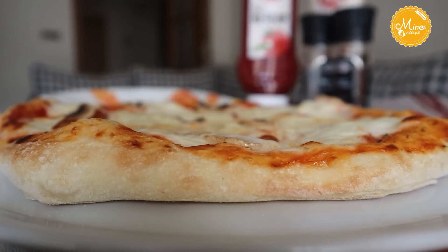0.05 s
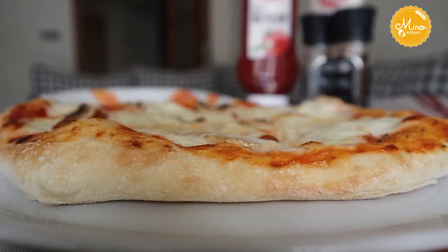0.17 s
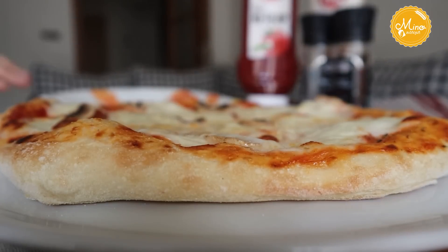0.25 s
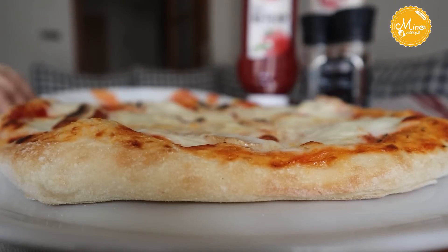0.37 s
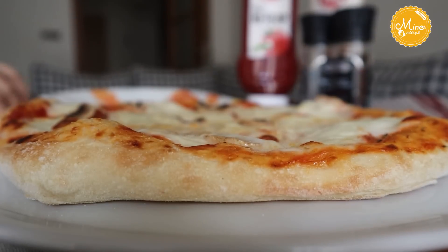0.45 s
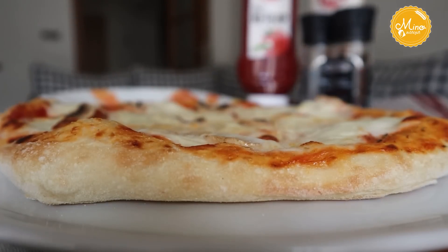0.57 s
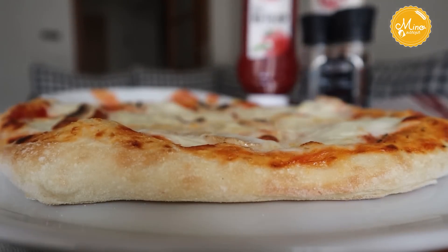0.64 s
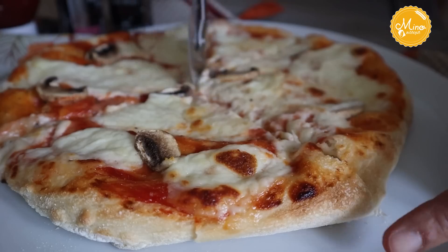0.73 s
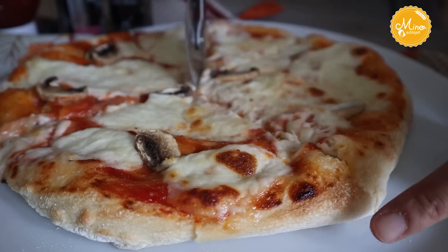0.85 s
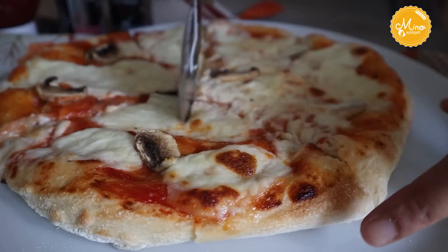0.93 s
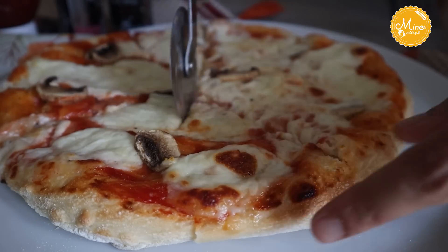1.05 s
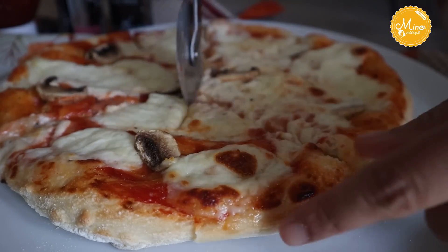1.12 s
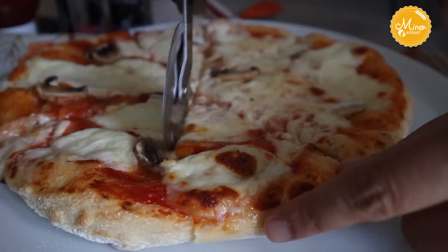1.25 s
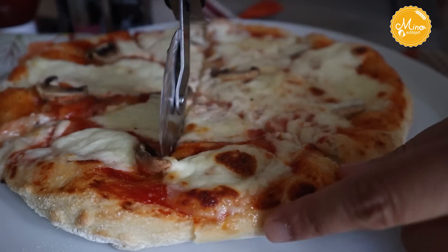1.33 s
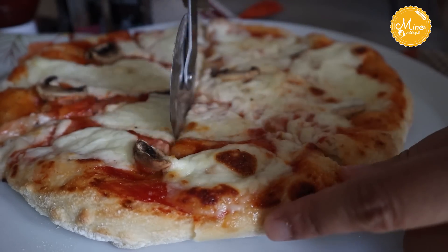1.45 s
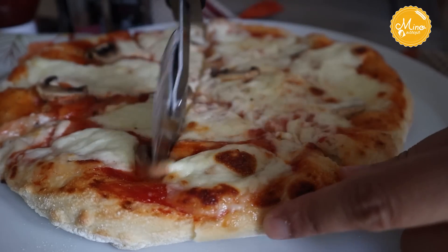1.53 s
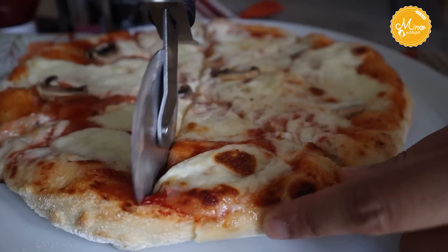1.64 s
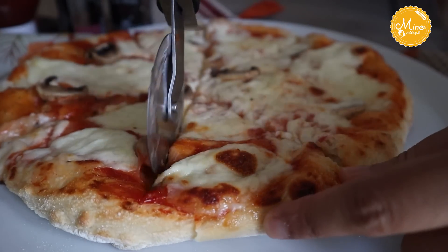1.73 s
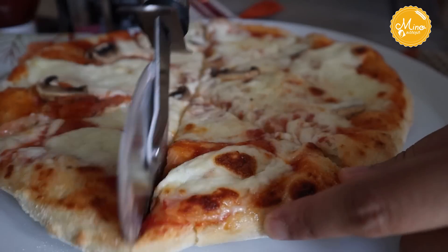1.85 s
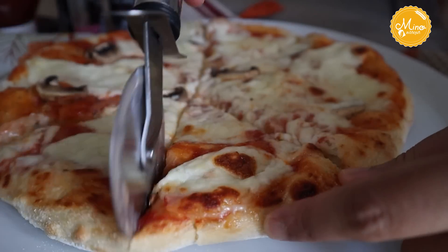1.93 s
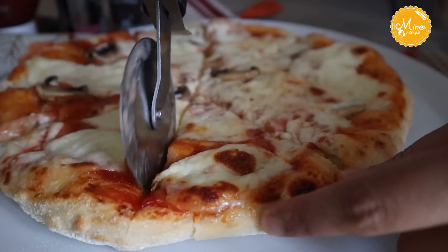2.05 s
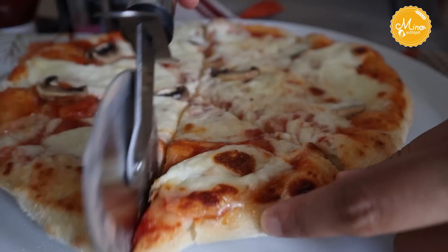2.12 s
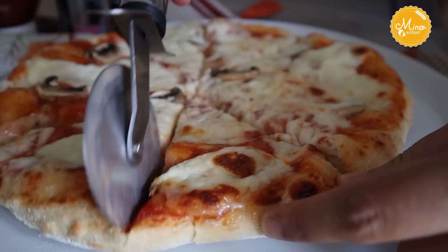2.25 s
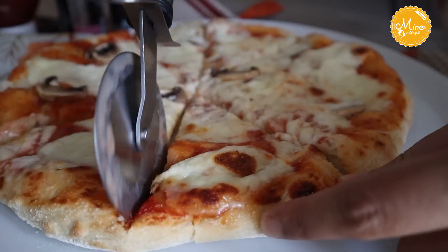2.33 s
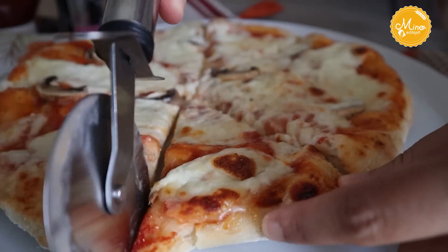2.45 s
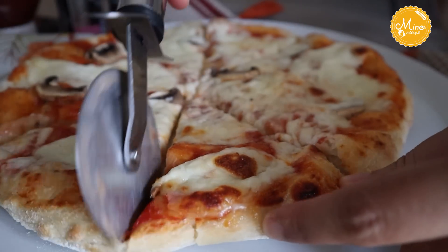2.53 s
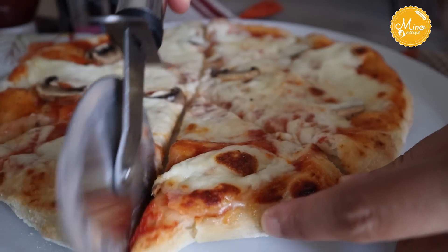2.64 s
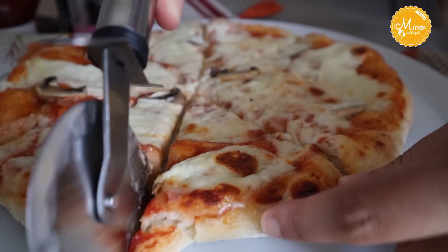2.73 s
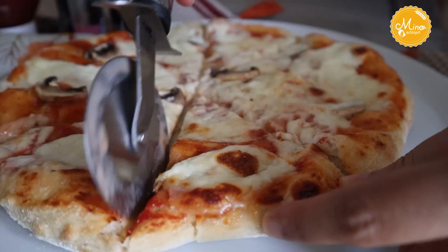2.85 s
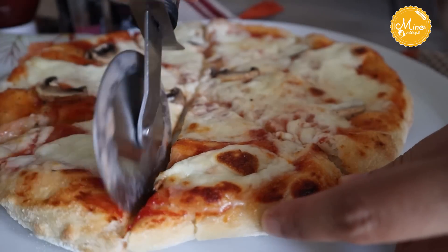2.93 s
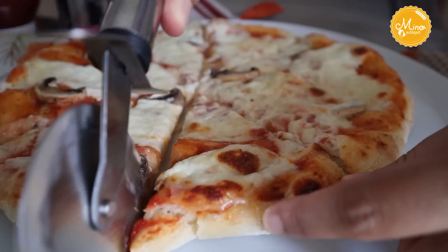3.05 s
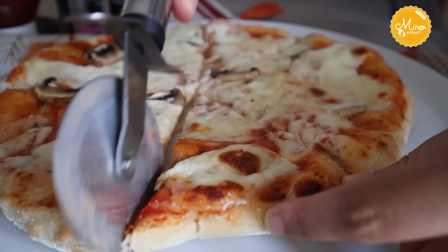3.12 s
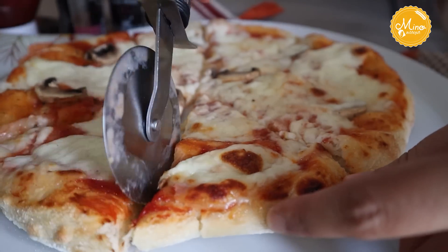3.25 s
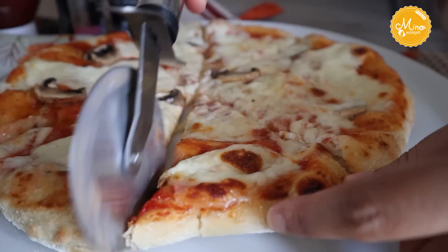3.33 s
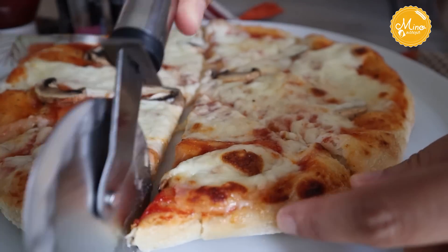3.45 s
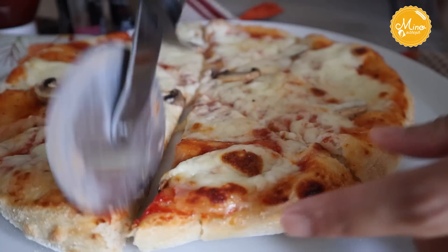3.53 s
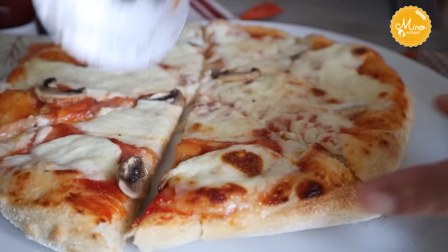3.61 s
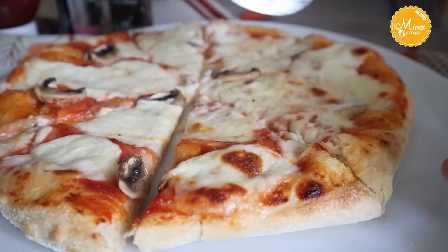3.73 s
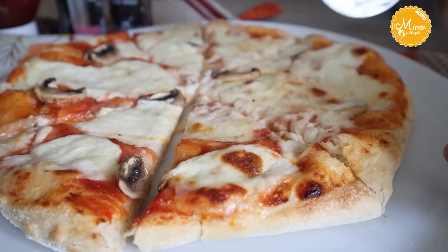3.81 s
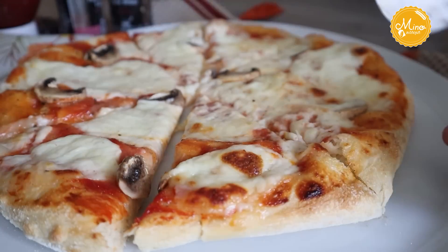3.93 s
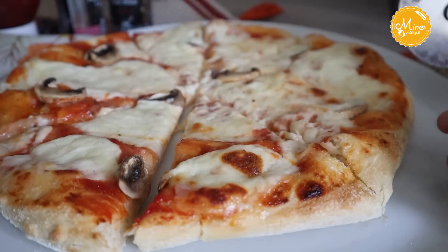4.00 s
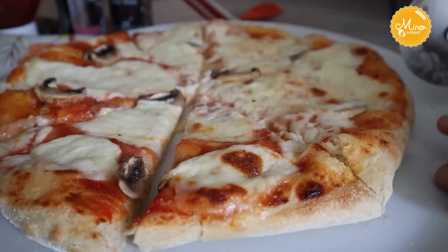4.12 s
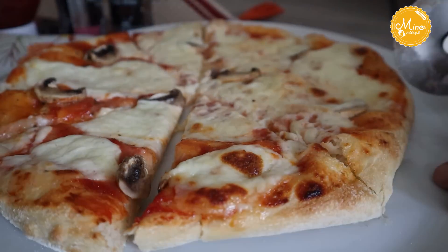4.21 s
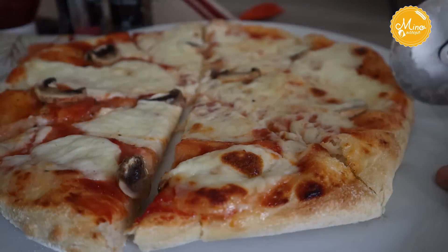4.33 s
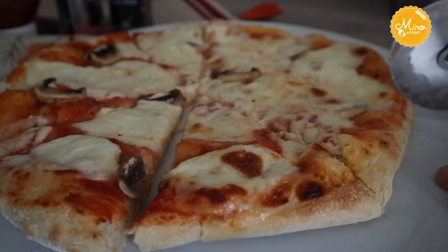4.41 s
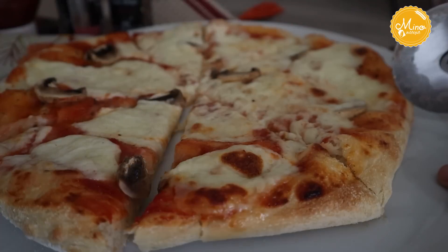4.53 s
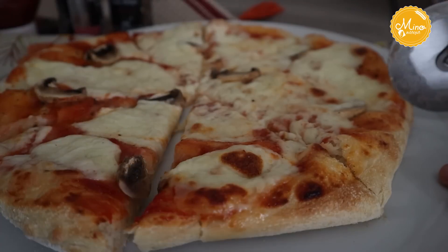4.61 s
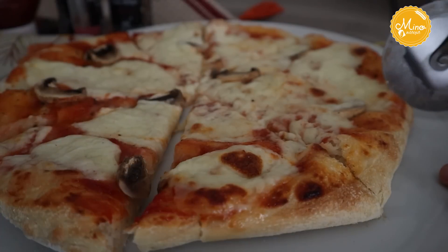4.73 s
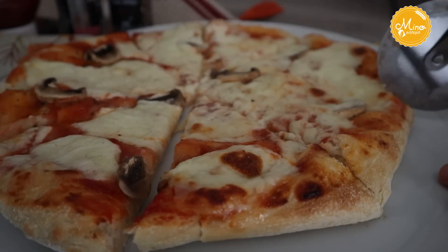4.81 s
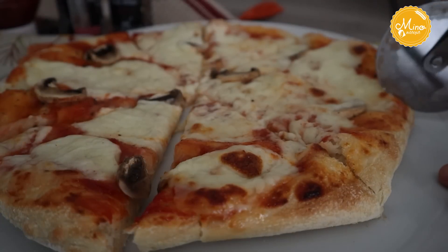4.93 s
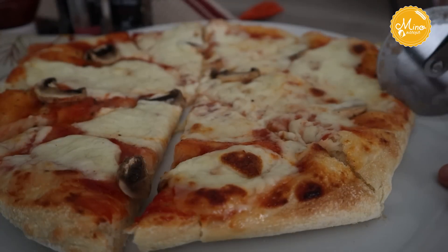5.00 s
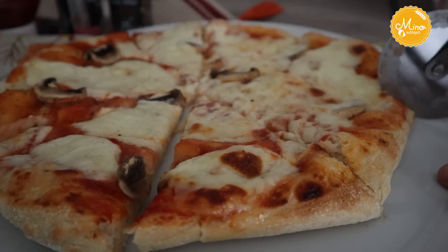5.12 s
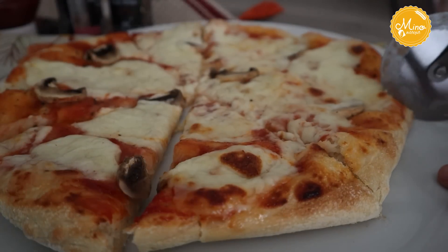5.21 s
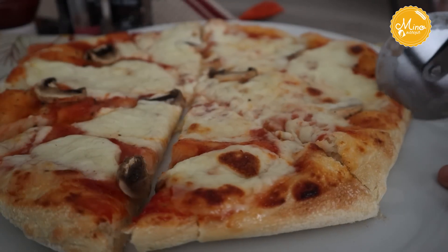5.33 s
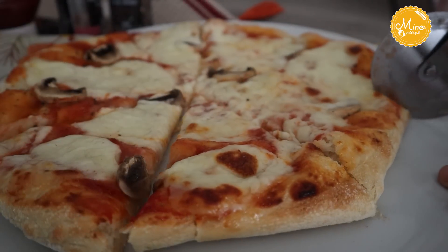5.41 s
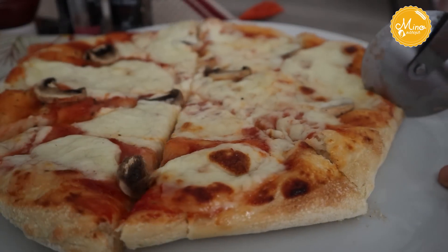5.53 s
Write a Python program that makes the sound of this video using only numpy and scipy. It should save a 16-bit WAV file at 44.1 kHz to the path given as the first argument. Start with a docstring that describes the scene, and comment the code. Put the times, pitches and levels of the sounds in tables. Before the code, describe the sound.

A hand brushes the table in one soft swish. From about 0.4 seconds a steel pizza cutter is picked up with quick clicks and a light metallic ring, cut off abruptly at 0.7. From 0.8 the wheel rolls back and forth through a pizza in short pushes, with a fine gritty grinding and a low rumble in the table. The wheel chatters and sings thinly on its axle, and its rim clicks against the ceramic plate. Small dry crust snaps cluster between 1.6 and 2.7 seconds. The loudest cracks of steel on ceramic come at about 2.8, 3.1 and 3.5 seconds, each with a bright rattle. After 3.6 the cutting eases into light, scattered ticks of the cutter in the hand. At 5.3 seconds the wheel hits the plate with a sharp clink and a soft thud. Everything is close, over a faint room hum.

```python
"""A steel cutter wheel rolls to and fro through a pizza on a ceramic plate, heard close up.
Rolling grinds in fine grains and rumbles in the table; the wheel chatters and sings on its axle.
Rim strikes, crust snaps and handle ticks each crack, knock the plate and ring the wheel.
First a hand slides over the table and the cutter is picked up; its free ring is cut off abruptly.
A quiet room hums behind."""
import sys
import numpy as np
from scipy import signal
from scipy.fft import rfft, irfft, next_fast_len
from scipy.io import wavfile
from scipy.ndimage import map_coordinates

SR = 44100
rng = np.random.default_rng(int(sys.argv[2]) if len(sys.argv) > 2 else 0)


def unload_audio(sound):
    """Save the sound as a 16-bit wav file, at the path given as the first command line argument."""
    columns = np.transpose(np.atleast_2d(sound))
    # keep every value between -1 and 1, then stretch to whole-number steps
    steps = np.round(np.clip(columns, -1, 1) * 32767)
    wavfile.write(sys.argv[1], SR, steps.astype(np.int16))


N = 245195

# Pushes on the wheel: full_pressure_s, hold_s, grind_db, plate_hum_db, rumble_db
PUSHES = [(0.578, 0.18, -50, -104, -78), (0.821, 0.035, -35.5, -40, -57), (0.964, 0.04, -34, -29.5, -40),
          (1.188, 0.0052, -44.5, -51, -44), (1.301, 0.058, -44, -35.5, -33.5),
          (1.495, 0.012, -43.5, -41, -44), (1.608, 0.096, -42, -41.5, -37), (1.8, 0.033, -44, -60, -43),
          (1.913, 0.054, -43, -39.5, -35.5), (2.081, 0.043, -38, -55, -37.5),
          (2.204, 0.17, -38, -45, -42.5), (2.483, 0.064, -38.5, -45, -48), (2.62, 0.041, -43, -47, -46.5),
          (2.766, 0.0046, -32.5, -53, -42), (2.81, 0.14, -42, -45, -43), (3.094, 0.025, -35, -43, -35.5),
          (3.17, 0.12, -41.5, -45, -39), (3.442, 0.026, -36.5, -54, -56), (3.54, 0.14, -48.5, -73, -63),
          (4.439, 0.049, -48, -57, -78), (5.253, 0.11, -46.5, -68, -44)]
# Weight of hands and cutter on the table: time_s, rumble_db
WEIGHT = [(0.42, -41), (0.47, -44.5), (0.74, -50), (1.27, -45.5), (2.0, -55), (2.2, -35.5), (3.0, -44.5),
          (3.45, -39.5), (3.75, -59), (4.1, -72), (4.45, -49), (4.9, -56.5), (5.2, -48), (5.56, -61)]
# Tone of the grinding rim: freq_hz, gain_db
GRIND_EQ = [(300, -36), (500, 7.5), (750, -20.5), (1000, 6), (1320, 4.5), (1700, -1.5), (2400, 3.5),
            (3300, 3), (4200, -6), (7000, -11.5), (15000, -26)]
# Tone of the table's rumble: freq_hz, gain_db
RUMBLE_EQ = [(12, -37.5), (20, 11), (168, 1), (223, -2.5), (274, 3), (410, -11.5), (700, -11.5),
             (1540, -120)]
# Wheel touching food or plate: pitch_hz, rim_blow_db, t60_s, axle_chatter_db
WHEEL_MODES = [(6080, -16, .025, -12), (7550, -16, .015, -17), (13330, -13, .024, -5),
               (8640, -24, .08, -28), (9205, -26, .4, -36), (12962, -24, .33, -35), (15012, -30, .43, -39),
               (9875, -24, .06, -24), (9295, -5, .07, -9)]
# Plate on the table: pitch_hz, level_db, t60_s
PLATE_MODES = [(78.3, -15, 0.14), (114, -11.5, 0.074), (181, -10, 0.049), (297, -6.5, 0.02),
               (469, -23, 0.27), (525, -32, 0.31), (577, -21.5, 0.22), (724, -5.5, 0.018),
               (1327, -3.5, 0.027), (1563, -10.5, 0.007), (2360, -2.5, 0.013), (3180, -2, 0.017),
               (4560, -7.5, 0.02)]
# The rim meets the plate: start_s, level_db, pitch_hz, relative_knock_db, relative_ring_db
STRIKES = [(0.5067, -16, 6940, -22.5, -2.5), (.871, -9, 3550, -11.5, -0.5), (0.9882, -8, 3000, -11.5, -22),
           (1.075, -20, 5900, -14, -24), (1.282, -40, 6120, 2, -21), (1.3412, -14.5, 730, -10, -27),
           (1.9393, -14, 1900, -12, -40), (1.942, -5, 2840, -9.5, -40), (2.2864, -18, 5930, -38, -18),
           (2.376, -9, 3300, -15.5, -34), (2.807, 4, 1420, -7.5, -37), (2.8281, -4.5, 1630, -10.5, -4.5),
           (3.1406, 0, 1356, -2, -14.5), (3.1734, -3.5, 1440, -8.5, -3), (3.5236, 3, 1620, -12.5, -44.5),
           (3.5399, -7, 3500, -28, -6), (3.6102, -21.5, 8200, -41, -21), (5.297, 2.5, 2370, -21, -40)]
# The crust snaps under the wheel: start_s, level_db, pitch_hz, relative_knock_db
SNAPS = [(.843, -17, 1210, -22), (1.157, -28, 2730, -17), (1.1985, -27, 4840, -13),
         (1.614, -26.5, 1400, -5), (1.6383, -26, 6280, -17), (1.6779, -15.5, 2430, -22),
         (1.711, -15.5, 910, -8.5), (1.7254, -18.5, 2350, -24), (1.7941, -27, 1300, -9),
         (1.829, -25, 1330, -20), (1.9052, -21, 3380, -15), (1.9598, -15.5, 3550, -22),
         (2.0496, -16.5, 740, -17), (2.101, -18.5, 3350, -7), (2.1287, -20.5, 474, -16),
         (2.143, -25.5, 5570, -3), (2.3303, -31, 1310, 3), (2.4437, -24, 795, -33), (2.5388, -22, 2620, -3),
         (2.6543, -20.5, 2530, -20), (2.986, -38, 4000, -19), (3.3492, -32, 5000, -26), ]
# The cutter ticks in the hand: start_s, level_db, pitch_hz
TICKS = [(0.447, -37, 7700), (0.5, -25, 7400), (0.5857, -17.5, 3330), (.597, -16, 3220),
         (0.6213, -21, 3350), (0.644, -15.5, 3470), (0.6644, -9.5, 1880), (0.667, -10, 2970),
         (0.7091, -11.5, 2520), (3.611, -19.5, 2850), (3.643, -25.5, 2700), (3.766, -29.5, 2920),
         (3.7914, -34, 2430), (3.8074, -22, 2560), (3.8333, -26.5, 2100), (3.902, -28.5, 2640),
         (3.9648, -21, 2490), (4.026, -35.5, 7260), (4.036, -27.5, 1850), (4.078, -31, 2060),
         (4.082, -34, 7400), (4.2234, -17.5, 1970), (4.237, -27, 5760), (4.253, -24.5, 2670),
         (4.28, -41, 6400), (4.298, -35, 1960), (4.4297, -33.5, 4800), (4.459, -17.5, 2340),
         (4.4779, -20, 7400), (4.5272, -28.5, 2790), (4.6424, -26.5, 3000), (4.651, -34.5, 5400),
         (4.785, -30.5, 1980), (5.0974, -25.5, 2200), (5.112, -28.5, 2980), (5.145, -20, 2030),
         (5.156, -27, 3030), (5.247, -31, 2170), (5.404, -32.5, 2060), (5.475, -32.5, 2560)]
# The wheel chatters on its axle: start_s, crunch_db, sing_db, sing_drive_s
RATTLES = [(0.445, -42, -71, 0.23), (0.6, -43, -34.5, 0.66), (0.858, -31, -30, 0.053),
           (0.982, -31, -22.5, 0.093), (1.069, -38, -27, 0.029), (1.278, -30, -34, 0.065),
           (1.303, -43, -25, 0.062), (1.342, -29.5, -19, 0.05), (1.604, -44, -50, 0.15),
           (1.698, -44.5, -71, 0.047), (1.903, -41, -45.5, 0.11), (1.932, -33.5, -35.5, 0.08),
           (2.091, -42, -62, 0.017), (2.211, -30.5, -33, 0.07), (2.282, -60, -32, 0.052),
           (2.33, -31.5, -30, 0.04), (2.48, -35, -36, 0.066), (2.534, -39.5, -44, 0.033),
           (2.763, -35.5, -41, 0.043), (2.805, -24.5, -20, 0.083), (3.096, -36.5, -36, 0.097),
           (3.138, -14.5, -18.5, 0.026), (3.167, -27.5, -23.5, 0.1), (3.453, -53, -51, .033),
           (3.53, -27, -15.5, 0.051), (3.622, -40.5, -47, 0.058), (4.028, -42, -50, 0.069),
           (5.287, -35, -31.5, 0.074)]
# Tone of the axle's crunch: freq_hz, gain_db
CHATTER_EQ = [(400, -4.5), (1300, -6), (3000, -1.5), (6000, -4.5), (10000, -9), (15500, -27)]
# Knocks on the wheel in the air: start_s, level_db, low_mode_gain_db
FREE_KNOCKS = [(0.666, -19, -13), (0.7091, -19, -8.5)]
# Wheel in the air: pitch_hz, level_db, t60_s
FREE_MODES = [(2360, -3, .1), (4064, 0, .28), (8495, -12, .2), (9680, -10, .07), (11133, -10, .15),
              (12905, -4, .1), (14065, -8, .23), (14282, -7, .2)]
# The cutter's fork and handle: pitch_hz, level_db, t60_s
HANDLE_MODES = [(1965, -6.5, 0.025), (2626, -5, 0.039), (3654, -13, 0.022), (5620, -9, 0.017),
                (7620, -2.5, 0.029), (8100, -1.5, 0.023)]
# The wheel taps the plate's bare edge: start_s, level_db
EDGE_TAPS = [(3.917, -47), (5.156, -49), (5.298, -16.5)]
# Bare edge of the plate: pitch_hz, level_db, t60_s
EDGE_MODES = [(225, -1, 0.029), (1067, -11.5, 0.12), (1570, 2, 0.03), (1890, -5, 0.067), (2760, 1, 0.071),
              (3500, -5, 0.065), (4470, 5, 0.03), (5370, -8.5, 0.057), (5860, -11, 0.09),
              (7460, -14.5, 0.063)]
# Soft bumps in the table: start_s, level_db, pitch_hz
THUDS = [(1.191, -25, 300), (1.341, -13, 267), (3.917, -33, 200), (5.151, -25.5, 127), (5.291, -19, 114)]
# Swell of a hand sliding over the table: time_s, level_db
SLIDE_SWELL = [(0.03, -63), (0.086, -43.5), (0.17, -39), (0.3, -58)]
# Tone of that slide: freq_hz, gain_db
SLIDE_EQ = [(180, -8.5), (523, -8.5), (910, -4.5), (1140, -12.5), (9000, -33.5), (19800, -120)]
# Decay of the room: freq_hz, t60_s
ROOM_DECAY = [(200, 0.24), (2000, 0.27), (6000, 0.36), (12000, 0.11)]
# Tone of the background hush: freq_hz, gain_db
HUSH_EQ = [(12, -51), (20, 6), (65, 1.5), (192, -4.5), (432, -5), (822, -12.5), (1150, -12.5), (15900, -28)]

PRESS_DB_PER_S, EASE_DB_PER_S = 426, 312  # how fast a push builds and lets go
IDLE_DB = -23  # grind and plate hum between pushes, relative to the rumble
HUM_TILT_DB_PER_OCTAVE = -9  # rolling shakes the plate's higher modes less
CRUMBS_PER_S, CRUMB_DB, CRUMB_SPREAD_DB = 180, -16, 0.5
OPEN_CUT_S, DOUGH_DB = (2.78, 3.3), -7  # the wheel runs clear of dough; its loss at other times
RIM_BLOW, AXLE_CHATTER = 1, 3  # level columns of WHEEL_MODES
SNAP_RING_DB, TICK_KNOCK_DB, TICK_RING_DB = -62, -51, -22
DETUNE_HZ_S = 2.34  # pitch spread times t60: damped modes shift most from rattle to rattle
RELEASE_MODE = (13620, -12, .025)  # high note as a rattle lets go: pitch_hz, level_db, t60_s
HANDLE_DB, HANDLE_FALL_DB_PER_OCTAVE = -10, 4.5
PICKUP_END_S, TOP_HZ = .7435, 15950


def rolling():
    """The rim grinds through crust and over glaze: grains rasp, shake the plate and rumble the table."""
    grind_gain, hum_gain, rumble_gain = pressure()
    rim = grains(spiky_db=4.5, clumpy_db=4.5) + amp(CRUMB_DB) * crumbs()
    modes = [(hz, db + HUM_TILT_DB_PER_OCTAVE * np.log2(hz), min(t60, .06))
             for hz, db, t60 in PLATE_MODES if hz > 500]
    hum = unit(signal.fftconvolve(rim, ring(modes, 0, size=SR // 8))[:N])
    rumble = unit(amp(3.7 * wobble(25.26)) * coloured(rng.standard_normal(N), RUMBLE_EQ))
    return grind_gain * coloured(rim, GRIND_EQ) + hum_gain * hum + rumble_gain * rumble


def pressure():
    """Gains of grind, plate hum and rumble: resting weight plus pushes that build, hold and let go."""
    t = np.arange(N) / SR
    gains = amp(envelope_db(WEIGHT) + np.array([[IDLE_DB], [IDLE_DB], [0]]))
    for s, hold_s, *levels_db in PUSHES:
        near = slice(round(s * SR) - SR // 4, round(s * SR) + SR // 2)
        age = t[near] - s
        push_db = PRESS_DB_PER_S * np.minimum(age, 0) - EASE_DB_PER_S * np.maximum(age - hold_s, 0)
        gains[:, near] += amp(np.add.outer(levels_db, push_db))
    return gains


def crumbs():
    """Scattered single crackles of slightly unequal size."""
    chance, size = rng.random(N), rng.exponential(size=N)
    clicks = (chance < CRUMBS_PER_S / SR) * rng.choice([-1, 1], N)
    return unit(clicks * amp(CRUMB_SPREAD_DB * np.minimum(size, 2.5)))


def wheel_modes(s, column):
    """The wheel's modes at time s; outside the open cut, dough muffles the long-ringing ones."""
    loss_db = 0 if OPEN_CUT_S[0] < s < OPEN_CUT_S[1] else DOUGH_DB
    return [(m[0], m[column] + loss_db * (m[2] > 0.25), m[2]) for m in WHEEL_MODES]


def contacts(rows, clink_db, cycles, crack_t60_s, q, tail, broad, bright_db, rise_s):
    """Each contact: a short pitched clink inside a noisy crack, the plate's knock and the wheel's ring."""
    out, t = np.zeros(N + SR), np.arange(SR // 16) / SR
    size = SR // 3
    for s, db, hz, knock_db, ring_db in rows:
        decay = amp(-60 * t / crack_t60_s) + tail * amp(-60 * t / 0.084)
        burst = rng.standard_normal(len(t)) * decay * (1 - np.exp(-t / rise_s))
        body = signal.lfilter(*signal.iirpeak(hz, q, SR), burst)
        bright_hz = 7700 * amp(0.32 * rng.standard_normal())
        bright = signal.lfilter(*signal.iirpeak(bright_hz, 3.5, SR), burst)
        clink = ring([(hz, clink_db, cycles / hz)], 0.14, size=len(t))
        bite = signal.lfilter([1, -1], [1, -.85], burst * (1 + 0.59 * amp(-60 * t / 0.0011)))
        crack = 1.85 * body + broad * bite + amp(bright_db + 5.1 * rng.standard_normal()) * bright
        plate = [(f * amp(0.071 * rng.standard_normal()), *rest) for f, *rest in PLATE_MODES]
        place(out, s, amp(db) * (crack + clink))
        place(out, s, amp(db + knock_db) * ring(plate, 3.5, size))
        place(out, s, amp(db + ring_db) * ring(wheel_modes(s, RIM_BLOW), 1.8, size))
    return out[:N]


def rim_strikes(during):
    """Steel meets ceramic with a hard crack."""
    return contacts([r for r in STRIKES if during(r[0])], clink_db=-14, cycles=38, crack_t60_s=0.017,
                    q=3.2, tail=0.16, broad=0.083, bright_db=-14, rise_s=0.00073)


def crust_snaps(during):
    """Crust breaks in short, dry snaps that barely ring the wheel."""
    rows = [(*r, SNAP_RING_DB) for r in SNAPS if during(r[0])]
    return contacts(rows, clink_db=3.5, cycles=4.6, crack_t60_s=0.0091,
                    q=1.8, tail=0.041, broad=0.15, bright_db=-18.5, rise_s=0.0008)


def axle_chatter(during):
    """Dense tiny knocks give two layers: a broad crunch, and the wheel singing, higher as it lets go."""
    crunch, sing = np.zeros((2, N + SR))
    knocks = grains(spiky_db=3, clumpy_db=6)
    for s, crunch_db, sing_db, drive_s in [r for r in RATTLES if during(r[0])]:
        progress = np.linspace(0, 1, int(drive_s * SR))
        crunch_progress = np.linspace(0, 1, int(1.36 * len(progress)))
        place(crunch, s, amp(crunch_db) * np.abs(np.sin(np.pi * crunch_progress ** 0.28)) ** 1.56)
        swell = amp(sing_db) * np.abs(np.sin(np.pi * progress ** 0.51))
        drive = swell * unit(knocks[round(s * SR):][:len(progress)])
        modes = [(hz + DETUNE_HZ_S / t60 * rng.standard_normal(), db, t60)
                 for hz, db, t60 in wheel_modes(s, AXLE_CHATTER)]
        wheel = ring(modes, 0.67, size=SR // 2)
        song = signal.fftconvolve(drive * (1 - progress ** 3), wheel)
        release = signal.fftconvolve(drive * progress ** 1.5, ring([RELEASE_MODE], 0, size=SR // 2))
        place(sing, s, (song + release) / np.linalg.norm(wheel))
    grit = grains(spiky_db=5.5, clumpy_db=3) + 0.69 * crumbs()
    return crunch[:N] * coloured(grit, CHATTER_EQ), 0.85 * sing[:N]


def handle_ticks(during):
    """The cutter ticks in the hand, ringing fork and handle most in the modes near the tick's pitch."""
    rows = [(*r, TICK_KNOCK_DB, TICK_RING_DB) for r in TICKS if during(r[0])]
    out = contacts(rows, clink_db=-21.5, cycles=55, crack_t60_s=0.022,
                   q=7.1, tail=0.22, broad=0.14, bright_db=-32, rise_s=0.00043)
    for s, db, hz, *_ in rows:
        modes = [(f * amp(0.11 * rng.standard_normal()),
                  level - HANDLE_FALL_DB_PER_OCTAVE * abs(np.log2(f / hz)), t60)
                 for f, level, t60 in HANDLE_MODES]
        place(out, s, amp(db + HANDLE_DB) * ring(modes, 4.9, size=SR // 16))
    return out


def free_wheel():
    """Undamped by food, the knocked wheel rings on clear modes."""
    out = np.zeros(N)
    for s, db, low_db in FREE_KNOCKS:
        modes = [(hz, level + low_db * (hz < 6000), t60) for hz, level, t60 in FREE_MODES]
        place(out, s, amp(db) * ring(modes, 0.96, size=SR // 8))
    return out


def plate_edge():
    """Free of dough, the plate's edge chimes when the wheel taps it."""
    out = np.zeros(N)
    for s, db in EDGE_TAPS:
        place(out, s, amp(db) * ring(EDGE_MODES, 1.3, size=SR // 4))
    return out


def table_thuds():
    """Soft bumps in the table, each dying within six low cycles."""
    out = np.zeros(N)
    for s, db, hz in THUDS:
        place(out, s, amp(db) * ring([(hz, 0, 6 / hz)], 0, size=SR // 8))
    return out


def hand_slide():
    """A hand brushes the table in one short, soft swish."""
    sliding = np.arange(N) / SR < SLIDE_SWELL[-1][0]
    return sliding * amp(envelope_db(SLIDE_SWELL)) * coloured(rng.standard_normal(N), SLIDE_EQ)


def room(x):
    """Adds a short reverb in which each frequency dies at its own speed."""
    hz, t, noise = signal.stft(rng.standard_normal(SR // 2), SR, nperseg=256)
    tail = signal.istft(noise * amp(-60 * t / along(ROOM_DECAY, hz)[:, None]), SR, nperseg=256)[1]
    predelayed = np.pad(x, (250, 0))
    return x + amp(-16.5) * signal.fftconvolve(predelayed, tail / np.linalg.norm(tail))[:N]


def ring(modes, spread_db, size):
    """Damped sines, each at a new strength; neighbouring modes start in opposite directions."""
    hz, db, t60 = np.transpose(modes)[:, :, None]
    t = np.arange(size) / SR
    level = db + spread_db * rng.standard_normal(db.shape) - 60 * t / t60
    sign = (-1.) ** np.arange(len(hz))[:, None]
    return np.sum(sign * amp(level) * np.sin(2 * np.pi * hz * t), axis=0)


def grains(spiky_db, clumpy_db):
    """Dense tiny impacts of very unequal size, in clumps."""
    return unit(rng.standard_normal(N) * amp(spiky_db * wobble(450) + clumpy_db * wobble(45)))


def wobble(rate_hz):
    """A smooth random curve."""
    knots = rng.standard_normal(int(N * rate_hz / SR) + 4)
    return map_coordinates(knots, [np.arange(N) * rate_hz / SR])


def coloured(x, eq):
    """x through an EQ curve, at rms 1."""
    size = next_fast_len(N + 8192)
    gain = amp(along(eq, np.fft.rfftfreq(size, 1 / SR)))
    return unit(irfft(rfft(x, size) * gain, size)[:N])


def envelope_db(points):
    """A fader ride: silent before the first point, held after the last."""
    return np.interp(np.arange(N) / SR, *np.transpose(points), left=-120)


def along(points, hz):
    """Reads a curve on a log frequency axis."""
    freqs, values = np.transpose(points)
    return np.interp(np.log(hz + 1), np.log(freqs + 1), values)


def place(track, start_s, sound):
    """Mixes a sound into a track."""
    track[round(start_s * SR):][:len(sound)] += sound


def amp(db):
    """Gain of a level in dB."""
    return 10 ** (np.asarray(db) / 20)


def unit(x):
    """x at rms 1."""
    return x / np.sqrt(np.mean(x ** 2) + 1e-20)


def scene():
    """The pickup stops dead and slicing takes over; the wheel's thin song is too near to wake the room."""
    gate = np.arange(N) < PICKUP_END_S * SR
    early, late = (lambda s: s < PICKUP_END_S), (lambda s: s >= PICKUP_END_S)
    friction = rolling() + hand_slide()
    early_crunch, early_song = axle_chatter(early)
    late_crunch, late_song = axle_chatter(late)
    early_hits = rim_strikes(early) + handle_ticks(early) + free_wheel()
    pickup = room(early_hits + early_crunch + friction * gate) + early_song
    late_hits = rim_strikes(late) + crust_snaps(late) + handle_ticks(late) + plate_edge() + table_thuds()
    slicing = room(late_hits + late_crunch + friction * ~gate) + late_song
    hush = amp(-50.5) * coloured(rng.standard_normal(N), HUSH_EQ)
    return (pickup * gate + slicing + hush)[None]


def record(dry):
    """The microphone loses the deepest bass, soft-clips the loudest knocks and drops the top treble."""
    thinned = signal.lfilter(*signal.butter(1, 45, "highpass", fs=SR), dry)
    clipped = thinned / (1 + np.abs(thinned) ** 8) ** (1 / 8)
    return signal.sosfilt(signal.ellip(12, .5, 85, TOP_HZ, fs=SR, output="sos"), clipped)


dry = scene()
out = record(dry)
unload_audio(out)
```